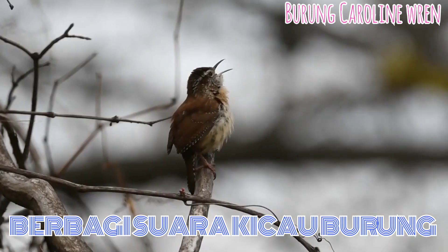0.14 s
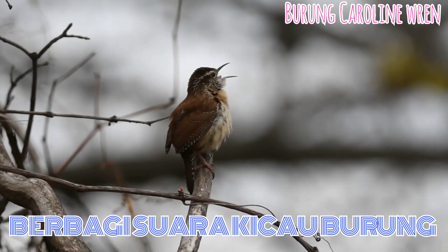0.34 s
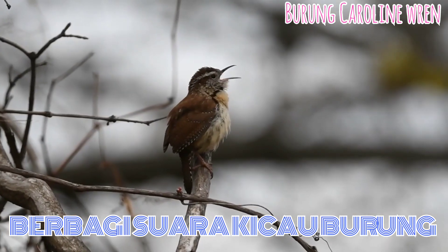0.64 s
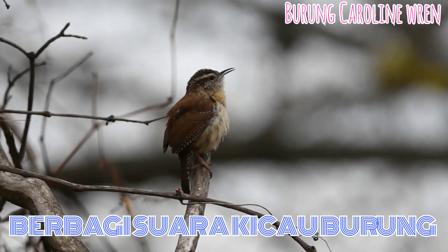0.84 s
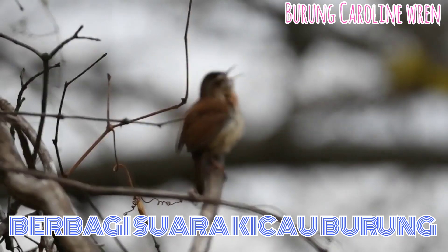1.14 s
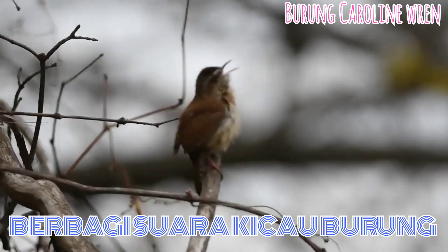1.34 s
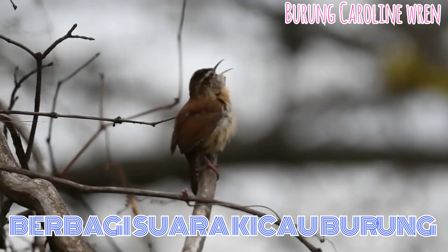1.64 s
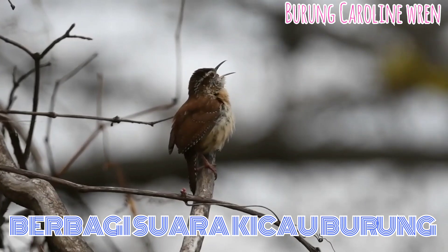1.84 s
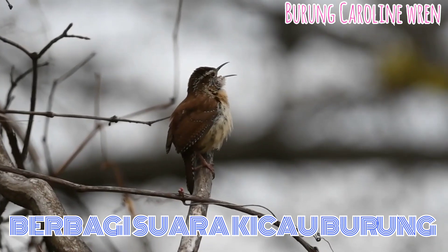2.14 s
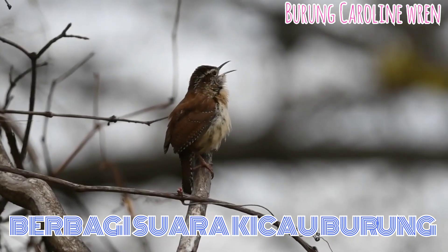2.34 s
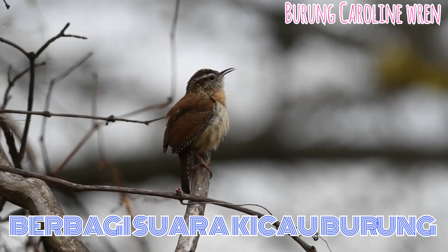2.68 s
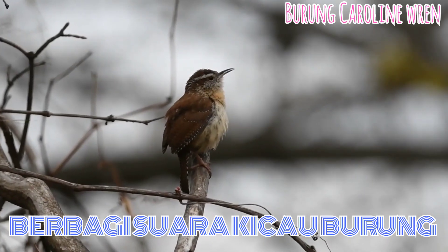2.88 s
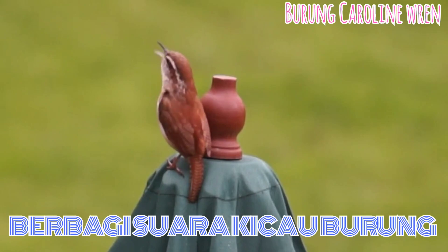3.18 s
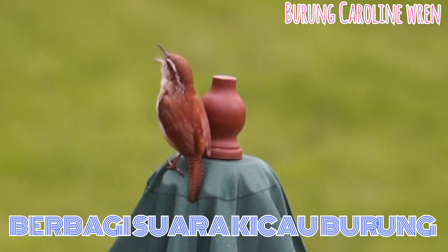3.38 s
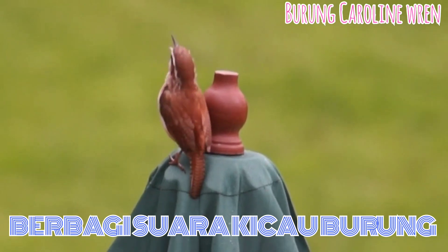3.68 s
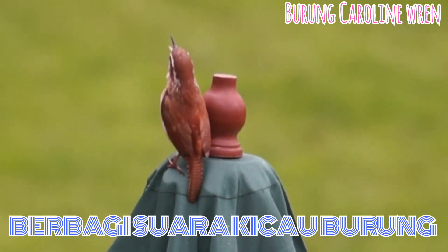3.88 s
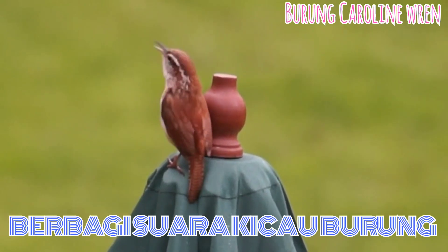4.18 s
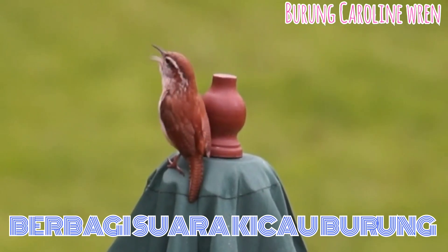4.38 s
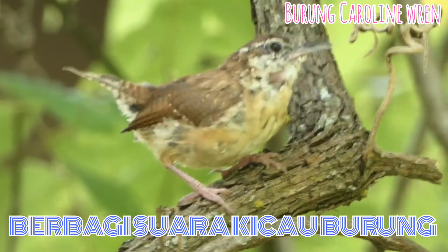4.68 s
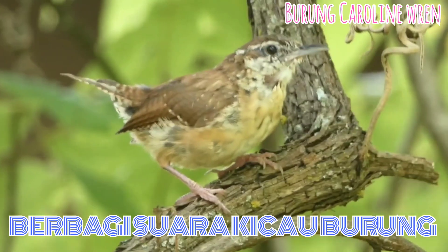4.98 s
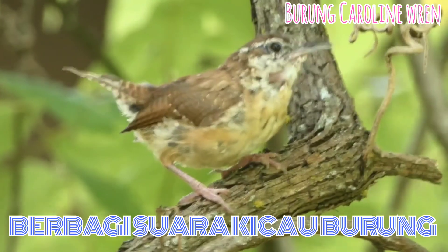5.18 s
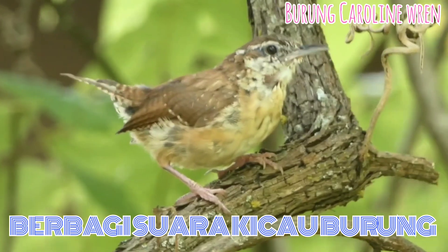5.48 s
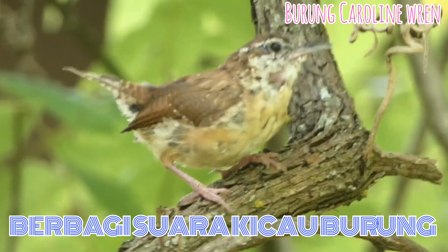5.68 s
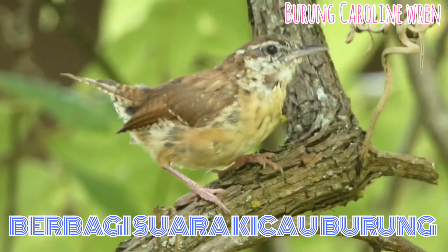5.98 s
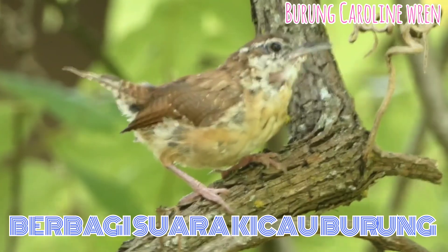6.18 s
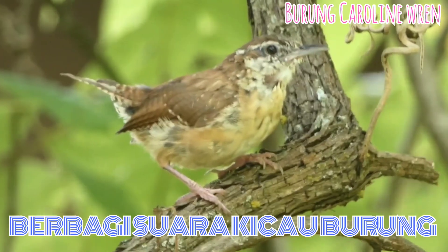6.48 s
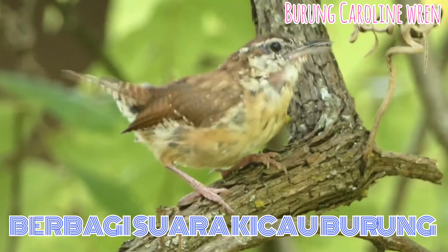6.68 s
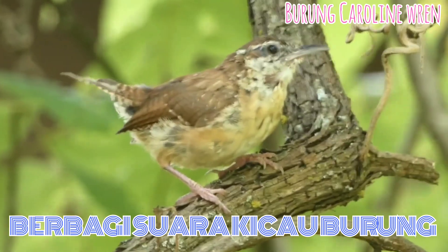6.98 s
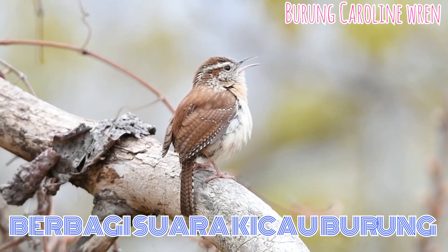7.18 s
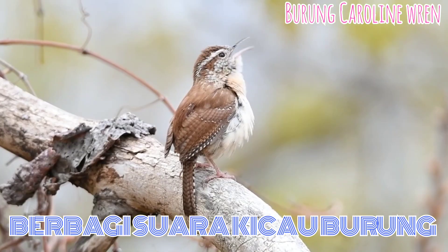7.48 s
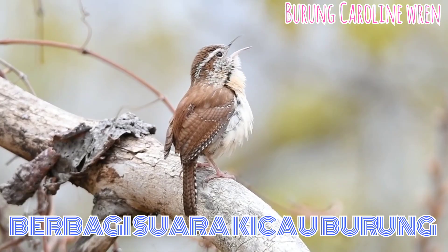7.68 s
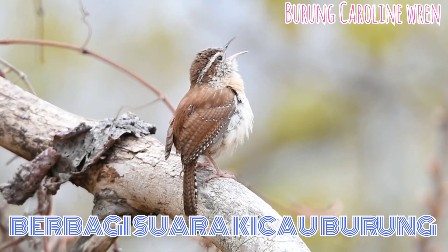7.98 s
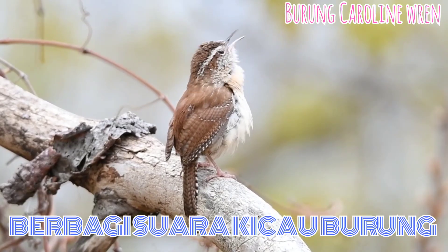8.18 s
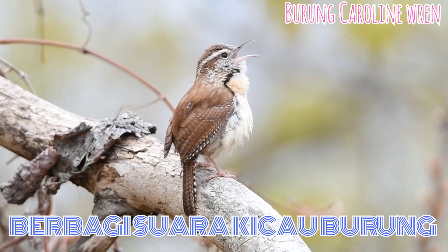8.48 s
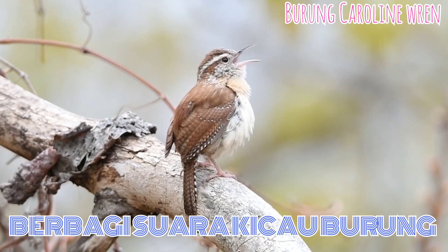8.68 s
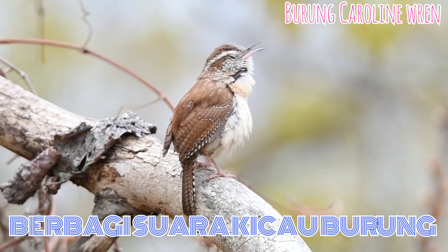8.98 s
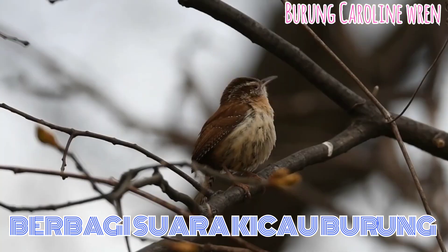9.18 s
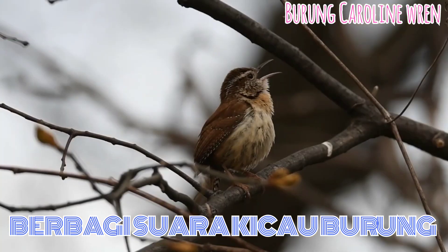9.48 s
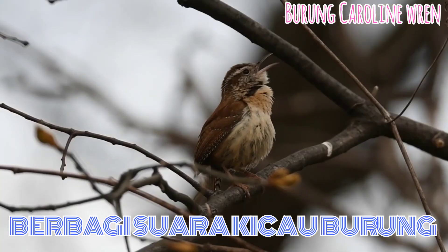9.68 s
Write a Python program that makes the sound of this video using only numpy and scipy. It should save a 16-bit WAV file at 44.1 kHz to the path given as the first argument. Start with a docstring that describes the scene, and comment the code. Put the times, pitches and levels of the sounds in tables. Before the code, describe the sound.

A wren close by sings bright whistled phrases, each about a third of a second and repeated without pause. Among branches it stops briefly while twigs tick, then resumes. The place cuts to an open lawn with rumble and dull handling knocks, then to a quiet spot with five falling trills, then to slower swooping phrases, and finally back to the branches. Light echoes and tree reverb surround it.

```python
"""Wren on four perches

A wren sings from a thicket, a post on a lawn, a shady limb and a fallen log, then from the thicket again.
Each bout repeats one phrase of four or five whistled notes, soft at first; on the limb it trills downwards.
Whistles are near-pure sines with faint overtones and hiss. Near surfaces echo them, trees leave a short tail.
Each place has its own shaped noise as hiss; twigs tick in the thicket, and on the lawn the camera gets
a few dull knocks, which ring its case and reach the two microphones mostly in opposite phase."""
import sys
import numpy as np
from scipy import signal
from scipy.fft import rfft, irfft, next_fast_len
from scipy.io import wavfile
from scipy.ndimage import uniform_filter1d

SR = 44100
rng = np.random.default_rng(int(sys.argv[2]) if len(sys.argv) > 2 else 0)


def inscribe(sig):
    """Save sig as 16-bit PCM at rate SR to the path in sys.argv[1].

    A 1-D sig is mono; a 2-D sig holds one channel per row.
    Samples are clipped to [-1, 1] before scaling.
    """
    pcm = np.round(np.clip(np.atleast_2d(sig).T, -1, 1) * 32767)
    wavfile.write(sys.argv[1], SR, pcm.astype(np.int16))


N = 433944
TIME = np.arange(N) / SR

# pitch paths of the notes: (t/s from the note's start, f/Hz before the phrase's sharpness)
ARCH = [(0, 1890), (.007, 4300), (.020, 4966), (.027, 4750), (.033, 3680), (.039, 3340), (.049, 3250)]
HOLD = [(0, 2720), (.030, 2586), (.060, 2620)]
FLICK = [(0, 3650), (.010, 3070), (.022, 2900)]
SWEEP = [(0, 1680), (.017, 2560), (.027, 3200), (.037, 3550), (.060, 3714), (.097, 3800)]
HOOK = [(0, 3277), (.010, 4174), (.023, 4953), (.030, 4913), (.038, 3400), (.046, 2860), (.062, 2800)]
CLIMB = [(0, 1928), (.020, 2069), (.038, 2463), (.050, 2610), (.068, 2656)]
LOW_FLICK = [(0, 3227), (.009, 2827), (.025, 2680)]
# the soft run-up to a plateau, and the plateau itself: same columns
RUN_UP = [(0, 2600), (.032, 3200)]
PLATEAU = [(0, 3195), (.013, 3480), (.060, 3490), (.080, 3420)]
SLIDE = [(0, 1883), (.008, 4830), (.014, 5670), (.022, 6390), (.033, 5350), (.044, 4920), (.073, 4315),
         (.112, 3828)]
SWELL = [(0, 2936), (.008, 2823), (.036, 2920), (.053, 2965)]
LONG_FLICK = [(0, 3787), (.014, 3203), (.031, 3020)]
DROP = [(0, 2754), (.007, 2623), (.022, 2288), (.036, 2150), (.074, 2122)]
# the notes of one phrase, in order: (pitch path, t/s into the unstretched phrase, relative level/dB, attack/s,
#   release/s, swell over the note/dB, share of the phrase's sharpness, overtones/dB,
#   their change per harmonic/dB, hiss/dB)
THICKET_SONG = [(ARCH, 0, -19.5, 0.012, 0.0075, 0.9, 0.42, -36.5, -2, -34),
                (HOLD, 0.056, -16.5, 0.019, 0.014, 1, 0.996, -40.5, -9.5, -43),
                (FLICK, .118, -18, 0.012, 0.008, -1, 0.23, -37.5, -8, -41.5),
                (SWEEP, .176, -19, 0.0095, 0.0098, -1.5, .85, -35.5, -7.5, -48.5)]
LAWN_SONG = [(HOOK, 0, -15.5, 0.027, .010, 8, 1, -41, -2.5, -26.5),
             (CLIMB, 0.1, -19, 0.019, .012, 4, 0.95, -31, 0.93, -30.5),
             (LOW_FLICK, .166, -13.5, .007, .011, -1.018, 0.44, -34.5, -2, -37.5),
             (RUN_UP, .192, -29, .010, .002, 7, 1, -28, -1, -37),
             (PLATEAU, .221, -14.5, 0.0026, 0.01, -2, 1, -37.5, -2.5, -40.5)]
LOG_SONG = [(SLIDE, 0, -19, 0.013, .006, 2, 0.4, -38.5, -1, -44),
            (SWELL, 0.1463, -15.5, 0.016, 0.011, 4.6, .9, -39.5, -7.5, -48),
            (LONG_FLICK, 0.2038, -16.5, 0.018, 0.01, -1, 0.37, -39.5, -8.5, -45),
            (DROP, 0.2714, -17.5, .009, 0.01, 4.2, 0.97, -36, -8.5, -49.5)]
# each bout repeats a phrase: (song, t/s when the voice comes in,
#   its phrases as (t/s, length ratio, pitch ratio, level change/dB))
BOUTS = [(THICKET_SONG, -1, [(-.171, 1.013, 1.046, 0), (.161, 1, 1.01, 0), (.486, 1.0, .995, 0)]),
         (THICKET_SONG, 1.081, [(.978, 1.057, 1.132, 2), (1.328, 1.054, 1.093, -1),
         (1.675, 1.03, 1.05, -.5), (2.009, 0.99, 1.004, 0.1), (2.333, 0.98, 1, 0)]),
         (LAWN_SONG, 2.94, [(3.122, 1.05, 1, 0), (3.486, 1.03, 0.99, -.5), (3.848, 1.025, 0.99, 0.5),
         (4.206, 1.095, .995, 0.2)]), (LOG_SONG, 7.23, [(7.187, 1.017, 1.01, -1), (7.574, 1.02, 1.002, 0.5),
         (7.961, 0.99, 1.016, 1), (8.342, 0.989, .994, 1.5), (8.725, 0.985, .994, 0)]),
         (THICKET_SONG, 9.273, [(9.272, 1.025, 1.115, 0.5), (9.614, 1.03, 1.073, 1.5)])]
# a bout fades in quickly, this much softer, and then gains strength with this time constant
ENTRY_DB_PER_S, WARM_UP_DB, WARM_UP_S = 701, 11.5, 0.2


def song(hiss_low_hz=4500, hiss_high_hz=13500):
    """Bouts of repeated phrases; the voice fades in at the start of a bout and grows to full strength."""
    out = np.zeros(N)
    hiss = rms_one(band(rng.standard_normal(N), hiss_low_hz, hiss_high_hz))
    for notes, entry_s, phrases in BOUTS:
        tones, forces = np.zeros((2, N))
        for s, stretch, sharpness, db in phrases:
            tone, force = phrase(notes, stretch, sharpness)
            add(tones, s, from_db(db) * tone)
            add(forces, s, from_db(db) * force)
        before = np.clip(entry_s - TIME, 0, 1)
        since = np.maximum(TIME - entry_s, 0)
        effort_db = -ENTRY_DB_PER_S * before - WARM_UP_DB * np.exp(-since / WARM_UP_S)
        out += from_db(effort_db) * (tones + forces / 2 * hiss)
    return out


# the squeak that opens every phrase: (t/s from the note's start, f/Hz)
SQUEAK = [(0, 4000), (.008, 6700), (.015, 9000)]
SQUEAK_DB, SQUEAK_FADE_DB = -19, -29.5   # against the first note; change over its length
# the voice is weaker at both ends of its range: (f/Hz, level/dB)
VOICE_RANGE = [(1700, -7), (2150, -2), (3300, 1), (4500, -2), (5050, -1), (6500, -14.5)]


def phrase(notes, stretch, sharpness, strain=5.4):
    """One round of a song, as tone and strength of hiss: forcing the pitch up makes a note hiss."""
    tone, force = np.zeros((2, SR))
    for (path, s, db, attack_s, release_s, swell_db,
         share, overtones_db, fall_db, hiss_db) in notes:
        ratio = 1 + share * (sharpness - 1)
        hz = ratio * contour(path, stretch * ratio)   # notes sung sharp are also drawn out
        level_db = envelope(len(hz), attack_s, release_s, swell_db) + at_hz(VOICE_RANGE, hz)
        add(tone, s * stretch, whistle(hz, db + level_db, overtones_db, fall_db))
        hiss_gain = from_db(db + level_db / 2 + hiss_db)   # the hiss swells less than the tone
        add(force, s * stretch, hiss_gain * (hz / hz.mean()) ** strain)
    hz = contour(SQUEAK, stretch)
    first_note_db = notes[0][2]
    level_db = SQUEAK_DB + envelope(len(hz), attack_s=0.0041, release_s=0.0018, swell_db=SQUEAK_FADE_DB)
    add(tone, 0, whistle(hz, first_note_db + level_db, second_db=-59.5))
    return tone, force


def contour(path, stretch):
    """Pitch of a note, sample by sample; the muscles round its corners."""
    knots, pitch = np.transpose(path)
    t = np.arange(int(knots[-1] * stretch * SR)) / SR / stretch
    return uniform_filter1d(np.interp(t, knots, pitch), size=130)


def envelope(size, attack_s, release_s, swell_db, edge_db=-26):
    """Level of a note in dB: attack, a hold that swells or sags, release."""
    t = TIME[:size]
    attack = np.maximum(1 - t / attack_s, 0) ** 2
    release = np.maximum(1 - t[::-1] / release_s, 0) ** 2
    return edge_db * (attack + release) + swell_db * (t / t[-1] - .5)


# how throat and beak colour the overtones: (f/Hz, level/dB)
BEAK = [(4000, 1), (5300, 1), (6800, 3.5), (7900, -15), (9300, -7), (11000, 7), (12200, 5.5),
        (14000, -13.5)]


def whistle(hz, level_db, second_db=-45, fall_db=-10, waver=0.0039, flutter_db=1.5):
    """A near-pure tone with a slight tremble, soft edges and faint overtones."""
    size = len(hz)
    phase = 2 * np.pi * np.cumsum(hz * (1 + waver * drift(700, size))) / SR
    edges = signal.windows.tukey(size, .005 * SR / size)
    gain = from_db(level_db + flutter_db * drift(300, size)) * edges
    tone = np.sin(phase)
    for k in range(2, 6):
        overtone_db = second_db + fall_db * (k - 2.5) + at_hz(BEAK, k * hz)
        tone = tone + from_db(overtone_db) * (k * hz < SR / 2) * np.sin(k * phase)
    return gain * tone


# starts of the trills: (t/s)
TRILLS = [4.7847, 5.2895, 5.794, 6.2979, 6.802]
# a trill opens with a high upstroke: (t/s from the trill's start, f/Hz)
UPSTROKE = [(0, 4800), (.010, 6080), (.018, 6300)]
UPSTROKE_DB = -22
# then rising chirps follow: (t/s from the trill's start, length/s, level/dB)
CHIRPS = [(0.011, .013, -21.5), (.033, 0.0118, -22), (0.054, 0.0148, -21.5), (.080, 0.0159, -22),
          (0.111, 0.0188, -23.5), (.140, .015, -23.5), (.172, 0.016, -23), (.203, .012, -30.5)]
CHIRP_FLOOR_HZ, CHIRP_EXCESS_HZ, CHIRP_SINK_S = 3055, 1587, 0.087   # their pitch sinks towards a floor
CHIRP_RISE = .1   # each rises from this share below its pitch to this share above


def trills(hiss_db=-29):
    """A high upstroke, then quick upward chirps, each lower than the last; the highest sounds hiss."""
    run = []
    for s, length, db in CHIRPS:
        hz = CHIRP_FLOOR_HZ + CHIRP_EXCESS_HZ * np.exp(-s / CHIRP_SINK_S)
        for start in TRILLS:
            run.append((start + s, length, hz * (1 - CHIRP_RISE), hz * (1 + CHIRP_RISE), db))
    voice = glides(run, edge_db=-12)
    hz = contour(UPSTROKE, 1)
    level_db = UPSTROKE_DB + envelope(len(hz), attack_s=0.011, release_s=0.0068, swell_db=-4.0)
    for start in TRILLS:
        add(voice, start, whistle(hz, level_db))
    force = uniform_filter1d(np.abs(band(voice, 4450, 7000)), size=400)
    hiss = rms_one(band(rng.standard_normal(N), 7400, 9000))
    return voice + from_db(hiss_db) * force * hiss


def glides(rows, edge_db):
    """Straight pitch glides that swell and fade."""
    out = np.zeros(N)
    for s, length, start_hz, end_hz, db in rows:
        u = np.linspace(0, 1, int(length * SR))
        level_db = db + edge_db * (1 - np.sin(np.pi * u ** 1.14))
        add(out, s, whistle(start_hz + (end_hz - start_hz) * u, level_db))
    return out


# the knocks: (t/s, strength/dB, brightness/dB per octave)
KNOCKS = [(3.658, -15, 1.5), (3.682, -20.5, -1), (3.767, -40.5, 12.5), (3.790, -37, 11),
          (3.808, -27.5, 1.5), (3.829, -30.5, 4)]
# the case rings and rocks the two microphones against each other:
#   (f/Hz, level/dB, t60/s, part common to both microphones/dB)
CASE = [(160, -8.5, .2, -16), (207, 0.5, .11, -23), (248, -12.5, .25, -21), (287, -9, 0.15, -21),
        (444, 1.5, 0.078, -7), (822, -14, 0.024, 3.5)]


def handling(pivot_hz=200):
    """Dull knocks ring the camera's case, mostly in opposite phase at the two microphones."""
    out = np.zeros((2, N))
    times, levels, brightness = np.transpose(KNOCKS)
    for hz, db, t60, common_db in CASE:
        clicks = np.zeros(N)
        clicks[(times * SR).astype(int)] = from_db(levels + db + brightness * np.log2(hz / pivot_hz))
        out += (from_db(common_db) + np.array([[-1], [1]])) * ring(clicks, hz, t60)
    return out


# twigs tick: (t/s, strength of the crackle/dB)
TICKS = [(1.065, -35), (1.110, -31), (1.146, -28), (1.299, -35.5), (1.334, -27.5), (1.543, -31.5),
         (1.567, -24.5), (1.723, -25.5), (9.379, -28.5), (9.417, -35.5)]
# the modes they ring with: (f/Hz, level/dB, t60/s)
TWIG = [(1570, -18.5, 0.0054), (2000, 3, 0.011), (3320, -3.5, 0.0034), (5650, -0.5, 0.0032),
        (9800, -22, 0.0016)]


def twigs(crack_s=0.0025):
    """Each tick is a brief crackle into the modes of dry wood."""
    cracks = np.zeros(N)
    for s, db in TICKS:
        burst = rng.standard_normal(400) * np.exp(-TIME[:400] / crack_s)
        add(cracks, s, from_db(db) * burst / np.linalg.norm(burst))
    return sum(from_db(db) * ring(cracks, hz, t60) for hz, db, t60 in TWIG)


def ring(x, hz, t60):
    """One mode: a unit click sets a decaying sine of height 1 ringing."""
    r = from_db(-60 / (t60 * SR))
    w = 2 * np.pi * hz / SR
    return signal.lfilter([0, np.sin(w)], [1, -2 * r * np.cos(w), r * r], x + 1e-18)


# faint whistles farther off: (t/s, length/s, start f/Hz, end f/Hz, level/dB)
FAR_WHISTLES = [(.19, 0.18, 2036, 2140, -50), (2.03, 0.19, 1970, 2230, -51), (3.11, 0.035, 2320, 2180, -42),
                (2.85, 0.07, 3400, 3200, -53.5), (7.20, .11, 3600, 3800, -56),
                (2.97, .06, 3000, 4100, -47.5)]


def far_birds():
    """Faint gliding whistles of birds farther off."""
    return glides(FAR_WHISTLES, edge_db=-6.5)


# echoes off near surfaces: (delay/ms, strength as a gain, right ear's extra delay/ms)
THICKET_ECHOES = [(0.918, 0.12, -0.1), (2.919, 0.077, 0.021), (9.348, 0.33, 0.027)]
# colour of the thicket's air: (f/Hz, relative level/dB)
THICKET_AIR = [(15, -31), (25, -25), (53, -7.5), (165, -1), (260, -5.5), (470, -2.5), (1170, -17.5),
               (2430, -22.5), (2630, -17.5), (3540, -28.5), (3840, -37), (4160, -24.5), (8610, -46.5),
               (11000, -44), (15600, -44)]
THICKET_DB = -43.5
# how much that air differs between the ears: (f/Hz, side minus mid/dB)
THICKET_SPREAD = [(60, -41.5), (110, -47.5), (200, -42), (380, -24.5), (700, -9), (1290, -2), (2380, 4),
                  (4400, 1.5), (8120, 1.5), (15000, 0.5)]


def thicket(birds):
    """Song and ticking twigs among close, wide-scattering branches."""
    wet = outdoors(birds + twigs(), THICKET_ECHOES, pan_db=0.0, scatter_t60=0.069, scatter_width=1.86,
                   tail_db=-13.5, tail_t60=0.42, tail_width=1.1)
    return wet + air(THICKET_AIR, THICKET_SPREAD, THICKET_DB)


# echoes: (delay/ms, strength as a gain, right ear's extra delay/ms)
LAWN_ECHOES = [(4.681, 0.28, 0.015), (5.262, 0.3, 0), (9.69, 0.24, 0.0025)]
# colour of the lawn's air: (f/Hz, relative level/dB)
LAWN_AIR = [(25, -15), (50, -5.5), (85, 2.5), (130, -13), (200, -10.5), (320, -17.5), (500, -13.5),
            (1000, -15.5), (2000, -21.5), (3500, -24.5), (5300, -35), (7500, -38), (11000, -45.5),
            (15000, -47)]
LAWN_DB = -38.5
# its difference between the ears: (f/Hz, side minus mid/dB)
LAWN_SPREAD = [(60, -18), (110, -19), (200, -3), (380, -3.5), (700, -5), (1290, -3.5), (2380, -4.5),
               (4400, -4), (8120, -5.5), (15000, 2.5)]


def lawn(birds):
    """Song from a post, a little to the left, with a longer tail and knocks on the camera."""
    wet = outdoors(birds, LAWN_ECHOES, pan_db=2.0, scatter_t60=0.29, scatter_width=1.4,
                   tail_db=-13.0, tail_t60=0.77, tail_width=0.62)
    return band(wet + air(LAWN_AIR, LAWN_SPREAD, LAWN_DB) + handling(), low_hz=12, high_hz=11000)


# echoes: (delay/ms, strength as a gain, right ear's extra delay/ms)
LIMB_ECHOES = [(5.5, 0.25, 0), (13.0, 0.24, 0)]
# colour of the air at the limb: (f/Hz, relative level/dB)
LIMB_AIR = [(15, -50), (25, -11), (148, -7.5), (322, -13), (482, -8.5), (795, -11), (901, -14),
            (2460, -10.5), (5910, -14.5), (10000, -15), (13000, -41), (22000, -120)]
LIMB_DB, LIMB_TOP_HZ = -63, 9950


def limb():
    """Trills in the shade, all in the middle, over a very quiet hiss that wells up between them."""
    wet = outdoors(trills(), LIMB_ECHOES, pan_db=0, scatter_t60=0.077, scatter_width=0,
                   tail_db=-9, tail_t60=0.21, tail_width=0)
    return cut_above(wet + air(LIMB_AIR, LIMB_SPREAD, LIMB_DB) + pause_hiss(), LIMB_TOP_HZ)


# echoes: (delay/ms, strength as a gain, right ear's extra delay/ms)
LOG_ECHOES = [(.55, 0.12, 0.05), (.63, 0.15, -0.13), (6.88, .25, .12)]
# colour of the air at the log: (f/Hz, relative level/dB)
LOG_AIR = [(25, -13.5), (60, -3), (110, 2.5), (160, -1), (225, 5.5), (310, -6), (450, -1), (1000, -12),
           (1700, -19), (3000, -20), (5000, -25.5), (8000, -44.5), (15000, -37.5)]
LOG_DB = -44
# its difference between the ears: (f/Hz, side minus mid/dB)
LOG_SPREAD = [(60, -20.5), (110, -29.5), (200, -31), (380, -24.5), (700, -11), (1290, -0.5), (2380, 3.5),
              (4400, -1.5), (8120, 2), (15000, 0)]


def fallen_log(birds):
    """Song from a fallen log, a little to the right, with a fainter tail."""
    wet = outdoors(birds, LOG_ECHOES, pan_db=-2.0, scatter_t60=0.13, scatter_width=1.36,
                   tail_db=-17.0, tail_t60=0.58, tail_width=0.89)
    return wet + air(LOG_AIR, LOG_SPREAD, LOG_DB)


def outdoors(x, echoes, pan_db, scatter_t60, scatter_width, tail_db, tail_t60, tail_width, scatter_db=-12):
    """Direct sound, near echoes, a quick scatter off branches and a longer tail from the trees."""
    t, hz = TIME[:SR], np.arange(SR // 2 + 1)
    ears = np.array([[-1], [1]])   # left, right
    paths = 1
    for ms, gain, lag_ms in echoes:
        paths = paths + gain * np.exp(-2j * np.pi * hz * (ms + ears * lag_ms / 2) / 1000)
    response = irfft(paths) * from_db(-ears * pan_db / 2)   # positive pan leans left
    for db, t60, width, build_s in [(scatter_db, scatter_t60, scatter_width, .002),
                                    (tail_db, tail_t60, tail_width, .012)]:
        fade = np.exp(-np.log(1000) * t / t60) * (1 - np.exp(-(t / build_s) ** 2))
        mid, side = rng.standard_normal((2, SR)) * fade
        response = response + from_db(db) * (rms_one(mid) + width * ears * rms_one(side)) / np.sqrt(SR)
    return signal.oaconvolve(x[None], response, axes=1)[:, :N]


# colour of the low hiss in the pauses: (f/Hz, relative level/dB)
PAUSE_AIR = [(40, -9), (150, -4), (330, -2), (700, -7), (1800, -3.5), (3000, -13), (6000, -38)]
PAUSE_DB = -66
# almost no difference between the ears at the limb: (f/Hz, side minus mid/dB)
LIMB_SPREAD = [(50, -60), (10000, -68)]
PAUSE_LEAD_S, PAUSE_END_S = .18, .02   # its start and end, before the trill


def pause_hiss():
    """Low hiss that wells up in the pause before each trill."""
    pauses = sum(during(s - PAUSE_LEAD_S, s - PAUSE_END_S) for s in TRILLS)
    return air(PAUSE_AIR, LIMB_SPREAD, PAUSE_DB) * pauses


def air(spectrum, spread, db):
    """Steady far-off hiss and rumble as shaped noise, partly shared by the two ears."""
    size = next_fast_len(N, True)
    hz = np.fft.rfftfreq(size, 1 / SR)
    mid, side = rfft(rng.standard_normal((2, size))) * from_db(at_hz(spectrum, hz))
    mid = irfft(mid)[:N]
    side = irfft(side * from_db(at_hz(spread, hz)))[:N]
    return from_db(db) * (mid + side * [[1], [-1]]) / np.std(mid)


def from_db(db):
    """Decibels to gain."""
    return 10 ** (np.asarray(db) / 20)


def rms_one(x):
    """Scale to unit rms."""
    return x / np.sqrt(np.mean(x ** 2) + 1e-20)


def at_hz(points, hz):
    """Read a table along log frequency."""
    f, value = np.transpose(points)
    return np.interp(np.log(np.maximum(hz, 1)), np.log(f), value)


def band(x, low_hz, high_hz):
    """Gentle band-pass."""
    edges = [low_hz, min(high_hz, SR / 2 - 1)]
    return signal.sosfilt(signal.butter(2, edges, "band", fs=SR, output="sos"), x)


def cut_above(x, hz):
    """Steep low-pass."""
    return signal.sosfilt(signal.ellip(10, .1, 80, hz, fs=SR, output="sos"), x)


def drift(rate, size):
    """Smooth random wander around 0, with `rate` new values a second."""
    knots = np.arange(size) * rate / SR
    return np.interp(knots, np.arange(size), rng.standard_normal(size))


def add(track, s, sound):
    """Mix a sound into a track at time s."""
    at = round(s * SR) + np.arange(len(sound))
    inside = (at >= 0) & (at < N)
    track[at[inside]] += sound[inside]


def during(start, end):
    """1 from start to end in seconds, 0 elsewhere, with quick edges."""
    return uniform_filter1d(1. * ((TIME >= start) & (TIME < end)), size=200)


def scene():
    """Four places, one after the other, and back to the first."""
    birds = song() + far_birds()
    out = thicket(birds) * (during(0, 2.908) + during(9.19, 10))
    out += lawn(birds) * during(2.908, 4.603)
    out += limb() * during(4.603, 7.11)
    out += fallen_log(birds) * during(7.11, 9.19)
    return out


def record(dry):
    """The microphones' signal with its top cut steeply."""
    return cut_above(dry, 15450)   # Hz


dry = scene()
out = record(dry)
inscribe(out)
```